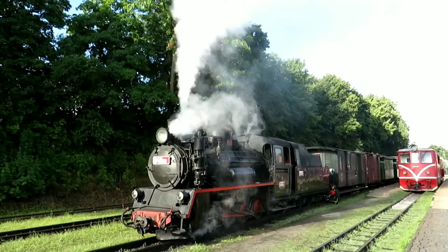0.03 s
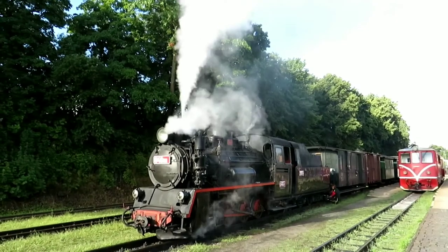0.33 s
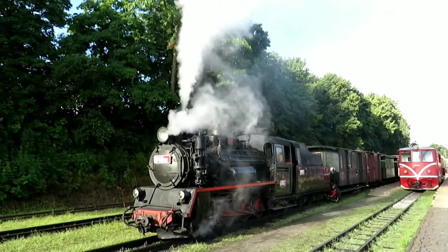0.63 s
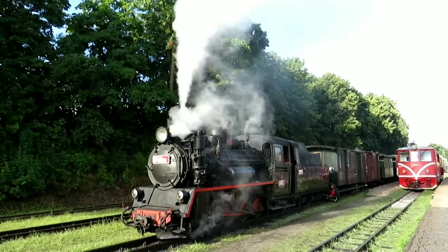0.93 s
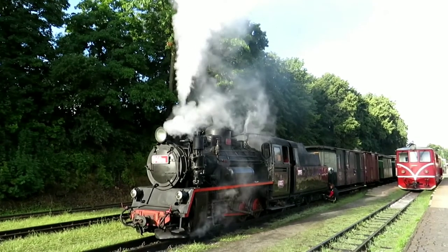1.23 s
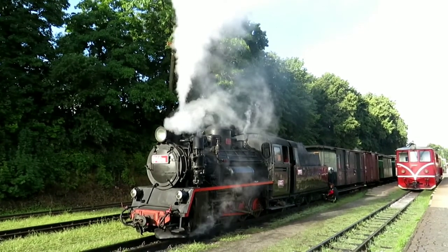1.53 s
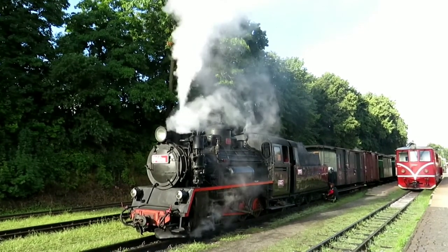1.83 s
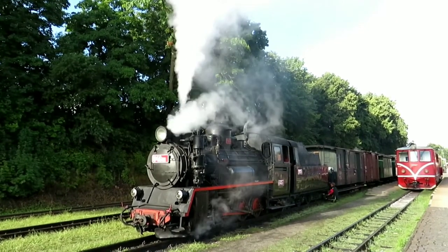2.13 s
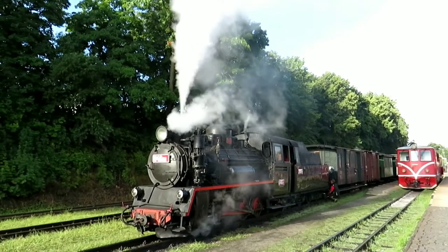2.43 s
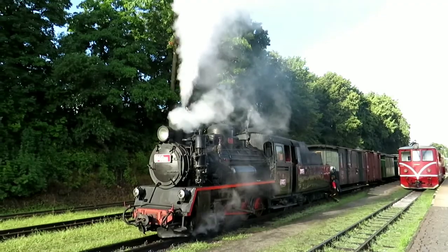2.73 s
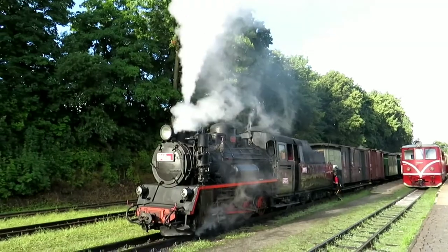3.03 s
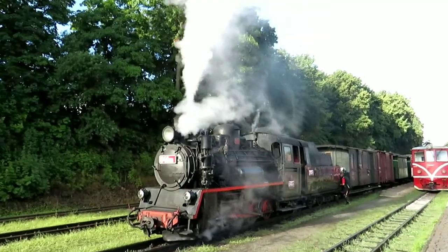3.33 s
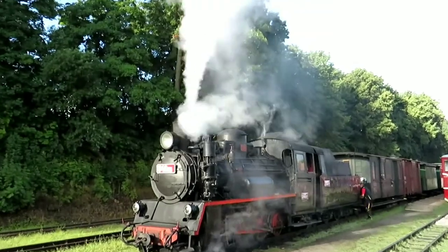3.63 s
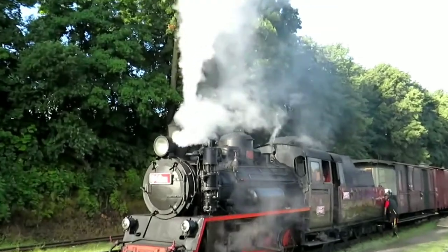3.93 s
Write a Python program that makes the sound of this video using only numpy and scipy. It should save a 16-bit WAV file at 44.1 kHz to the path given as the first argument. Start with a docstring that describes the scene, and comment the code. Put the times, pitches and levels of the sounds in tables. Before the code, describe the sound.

A standing steam locomotive's air pump puffs through the chimney about twice a second, sharp cracking strokes alternating with softer rushing ones. Each thumps and hisses away over a steady steam leak and faint boiler rumble outdoors.

```python
"""The air pump of a standing steam locomotive exhausts up the chimney, one double stroke a second.
At first a soft stroke is dying away over a steady steam leak and the rumble of the boiler.
At 0.4 s a sharp stroke opens with a crack; about half a second later a soft one opens with a rush.
Each thumps, then blows down and grows duller, and the two kinds alternate to the end.
Throughout, the chimney's resonances colour the steam, and trees and wagons add a short echo."""
import sys
import numpy as np
from scipy import signal
from scipy.fft import rfft, irfft
from scipy.io import wavfile
from scipy.ndimage import uniform_filter1d, map_coordinates

SR = 44100
rng = np.random.default_rng(int(sys.argv[2]) if len(sys.argv) > 2 else 0)


def wav_record(signal):
    """Record a signal, one row per channel, as 16-bit PCM in the file named by sys.argv[1]."""
    frames = np.transpose(np.atleast_2d(signal))
    bounded = np.clip(frames, -1, 1)
    # unit amplitude maps onto the largest positive 16-bit level
    quanta = np.round(bounded * 32767).astype(np.int16)
    wavfile.write(sys.argv[1], SR, quanta)


N = 176400

# Each row: start in seconds; relative crack, blast, thump and flow levels in dB; flow drop in dB,
# exponent of the drop, relative hiss level in dB, hiss fade in dB per second.
SHARP_STROKES = [(0.4145, -2, 0.5, 4, 1, 16, 2.23, 2.5, 59), (1.4251, -1.5, 2.5, 0, 0, 16, 2.5, 0, 54),
                 (2.4219, -2, 1.5, 0, 3, 14, 1.55, 1.5, 56.5),
                 (3.4012, -2, 2.5, 4.5, 1.5, 11, 1.94, 0.5, 70)]
# Each row: start in seconds; relative rush, thump and flow levels in dB; then as above from flow drop.
SOFT_STROKES = [(-.13, -6, -4, 1, 20.5, 4.3, -2, 17.5), (0.871, -3, 5.5, 3, 14.5, 2.8, 3.5, 35),
                (1.873, -4, 5, 3.5, 12.5, 4.2, 2, 30), (2.866, 1, 6, 0, 11, 9.2, 2.5, 39),
                (3.84, -0.5, 5.5, 2.5, 9, 3.7, 3, 41)]
# Spectra of the sources. Each row: frequency in Hz, relative spectral density in dB.
CRACK_SPECTRUM = [(40, -39), (250, -17), (1500, -10), (3000, -3), (4000, -1.5), (5000, 2.5), (5700, -6),
                  (7300, -10.5), (8300, -18), (11000, -23.5), (12500, -31), (15500, -37)]
BLAST_SPECTRUM = [(60, -30), (200, -0.5), (450, 6), (1200, 2.5), (2300, 4.5), (3500, -1.5), (6000, -21.5),
                  (10000, -39), (15500, -42)]
RUSH_SPECTRUM = [(60, -40), (200, -18.5), (450, 10.5), (900, 7), (2100, 9), (3200, 2), (5000, -10.5),
                 (9000, -23.5), (15500, -36)]
THUMP_SPECTRUM = [(25, -35), (42, -18), (62, -10), (95, -11), (135, -16.5), (185, 5), (280, -4.5),
                  (450, 1.5), (1500, -43), (15500, -80)]
FLOW_SPECTRUM = [(40, -71), (120, -38.5), (200, -8.5), (330, -7), (480, -2.5), (1100, -0.5), (2000, -1),
                 (3000, -2.5), (4300, -9.5), (6000, -23), (10000, -35.5), (15500, -57)]
HISS_SPECTRUM = [(300, -17), (2000, -20.5), (4000, 1.5), (5500, 0), (8000, -6.5), (10500, -11.5),
                 (13000, -19), (15500, -40)]
LEAK_SPECTRUM = [(40, -57), (130, -15), (195, -2.5), (330, -2), (520, 4.5), (1100, 1.5), (2400, -2),
                 (3200, -9.5), (4400, -11), (5500, -22), (9000, -29.5), (12000, -45), (15500, -49)]
RUMBLE_SPECTRUM = [(20, -11), (42, -20), (62, -1.5), (78, 1), (97, 1.5), (125, -1), (250, -13), (1000, -52)]
# Resonances and hollows of the chimney. Each row: frequency in Hz, width in Hz, gain in dB.
CHIMNEY_RESONANCES = [(202, 26, 0), (347, 59, -6), (537, 60, 4.5), (683, 46, -7), (793.5, 90, 6),
                      (1632, 110, 5.5), (1780, 54, -1.5), (1963, 120, 4), (2445, 164, 6.5), (2767, 33, 5),
                      (3184, 47, 4.5), (3270, 140, -4), (3511, 74, 8), (3620, 75, -8), (3833, 130, 5),
                      (4440, 180, 4), (4610, 80, -13), (4710, 120, 7), (5220, 55, 1), (6470, 82, 4.5)]
# Stereo spread. Each row: frequency in Hz, gain of the side signal in dB.
SIDE_SPECTRUM = [(100, -47), (1300, -96), (2400, -24.5), (4400, -11), (8000, -3.5), (15000, -6)]

SNAP_DB, CRACK_DB, BLAST_DB, RUSH_DB, THUMP_DB = 7, -12, -14.5, -17, -29.5
FLOW_DB, HISS_DB, LEAK_DB, RUMBLE_DB = -21.5, -29, -30, -54.5
SPUTTER_DB, SPUTTER_HZ, FLUTTER_DB, FLUTTER_HZ, SPIT_DB, SPIT_HZ = 0.5, 129, 0.82, 30, 0.5, 2500
RUSH_ATTACK_S, RUSH_PEAK_S, RUSH_WIDTH_S = 0.022, 0.041, 0.038
ECHO_DB, ECHO_T60_S, ECHO_DELAY_S = -10.5, 0.3, 0.015
TAPS = 8192


def undb(db):
    """Amplitude grows tenfold with every 20 dB."""
    return 10 ** (np.asarray(db) / 20)


def curve_db(points):
    """A spectrum is interpolated between its points on a log-frequency axis."""
    hz, db = np.array(points, float).T
    return np.interp(np.log(np.fft.rfftfreq(TAPS, 1 / SR) + 1), np.log(hz), db)


def minimum_phase(db):
    """Folding the cepstrum gives a causal impulse response with the given gain."""
    cepstrum = irfft(np.log(undb(db)))
    cepstrum[1:TAPS // 2] *= 2
    cepstrum[TAPS // 2 + 1:] = 0
    return irfft(np.exp(rfft(cepstrum)))


def ring(x, response):
    """Convolution applies a response; a mirrored lead-in has it sounding from the start."""
    lead_in = x[len(response) - 1:0:-1]
    return signal.fftconvolve(np.concatenate([lead_in, x]), response, mode="valid")


def colour(x, db):
    """A filter of unit energy colours a white sound and keeps its power."""
    response = minimum_phase(db)
    return ring(x, response / np.sqrt(np.sum(response ** 2)))


def wander(hz):
    """Noise averaged twice over 1 / hz seconds fluctuates smoothly; its spread is set to 1."""
    window = max(int(SR / hz), 1)
    drift = uniform_filter1d(rng.standard_normal(N), window, mode="wrap")
    drift = uniform_filter1d(drift, window, mode="wrap")
    return drift / drift.std()


def since(start):
    """Time runs in seconds from an onset and is 0 before it."""
    return np.maximum(np.arange(N) / SR - start, 0)


def puff(age, attack_s, decay_s):
    """A transient rises linearly and decays exponentially."""
    return np.minimum(age / attack_s, 1) * np.exp(-np.maximum(age - attack_s, 0) / decay_s)


def surroundings(x):
    """Scattering from trees and wagons adds a short, dull echo that decays exponentially."""
    t = np.arange(SR // 2) / SR
    tail = rng.standard_normal(len(t)) * (t > ECHO_DELAY_S) * np.exp(-np.log(1000) * t / ECHO_T60_S)
    tail /= np.sqrt(np.sum(tail ** 2))
    tail = signal.sosfilt(signal.butter(1, 5000, fs=SR, output="sos"), tail)
    return x + undb(ECHO_DB) * ring(x, tail)


def boiler_rumble():
    """The boiler radiates stationary low-frequency noise."""
    return undb(RUMBLE_DB) * colour(rng.standard_normal(N), curve_db(RUMBLE_SPECTRUM))


def steam_leak():
    """A leak is a continuous jet whose level flickers; returns (envelope, spectrum, dB)."""
    return undb(1.7 * wander(hz=27)), LEAK_SPECTRUM, LEAK_DB


def chimney(jets):
    """The spitting turbulence of each steam jet excites the resonances of the pipe."""
    hz = np.fft.rfftfreq(TAPS, 1 / SR)
    pipe_db = sum(db / (1 + (2 * (hz - centre) / width) ** 2) for centre, width, db in CHIMNEY_RESONANCES)
    spit = undb(SPIT_DB * wander(SPIT_HZ))
    spit /= np.sqrt(np.mean(spit ** 2))
    sound = np.zeros(N)
    for envelope, spectrum, db in jets:
        turbulence = envelope * spit * rng.standard_normal(N)
        sound += undb(db) * colour(turbulence, curve_db(spectrum) + pipe_db)
    return sound


def waver(x, spread_s=0.000419, hz=10.32):
    """A varying delay modulates frequency, so the resonances wander slightly in pitch."""
    return map_coordinates(x, [np.arange(N) + spread_s * SR * wander(hz)], order=5, mode="mirror")


def snaps():
    """Each sharp stroke begins with one pressure front, a filtered impulse."""
    fronts = np.zeros(N)
    for start, crack_db, *_ in SHARP_STROKES:
        fronts[int(start * SR)] = undb(SNAP_DB + crack_db)
    return colour(fronts, curve_db(CRACK_SPECTRUM))


def cracks():
    """Broadband spray follows each front and decays within milliseconds."""
    envelope = sum(undb(CRACK_DB + crack_db) * puff(since(start), attack_s=0.00041, decay_s=0.0078)
                   for start, crack_db, *_ in SHARP_STROKES)
    return colour(envelope * rng.choice([-1, 1], N), curve_db(CRACK_SPECTRUM))


def blow_down(age, flow_db, drop_db, exponent, hiss_db, fade_db_per_s, valve_s, length_s):
    """As the cylinder empties, the flow level falls ever faster while the hiss decays exponentially."""
    valve = np.minimum(age / valve_s, 1) * np.exp(-np.maximum(age - length_s, 0) / valve_s)
    flow = undb(flow_db - drop_db * (age / length_s) ** exponent)
    hiss = undb(hiss_db - fade_db_per_s * age)
    return valve * np.array([flow, hiss])


def air_pump():
    """Each stroke releases steam under pressure; returns five jets as (envelope, spectrum, dB)."""
    blast, rush, thump = np.zeros((3, N))
    steam = np.zeros((2, N))
    for start, _, blast_db, thump_db, *exhaust in SHARP_STROKES:
        age = since(start)
        blast += undb(blast_db) * puff(age, attack_s=0.0076, decay_s=0.016)
        thump += undb(thump_db) * puff(age, attack_s=0.0022, decay_s=0.03)
        steam += blow_down(age, *exhaust, valve_s=0.034, length_s=0.42)
    for start, rush_db, thump_db, *exhaust in SOFT_STROKES:
        age = since(start)
        swell = np.exp(-0.5 * ((age - RUSH_PEAK_S) / RUSH_WIDTH_S) ** 2)
        rush += undb(rush_db) * np.minimum(age / RUSH_ATTACK_S, 1) * swell
        thump += undb(thump_db) * puff(age, attack_s=0.0022, decay_s=0.03)
        steam += blow_down(age, *exhaust, valve_s=0.026, length_s=0.53)
    flow, hiss = steam * undb(SPUTTER_DB * wander(SPUTTER_HZ) + FLUTTER_DB * wander(FLUTTER_HZ))
    return [(blast, BLAST_SPECTRUM, BLAST_DB), (rush, RUSH_SPECTRUM, RUSH_DB),
            (thump, THUMP_SPECTRUM, THUMP_DB), (flow, FLOW_SPECTRUM, FLOW_DB),
            (hiss, HISS_SPECTRUM, HISS_DB)]


def scene():
    """The sources superpose straight ahead; an uncorrelated side signal spreads only the treble."""
    jets = air_pump() + [steam_leak()]
    mid = boiler_rumble()
    mid += waver(surroundings(chimney(jets)))
    mid += surroundings(snaps() + cracks())
    uncorrelated = surroundings(chimney(jets) + cracks())
    side = ring(uncorrelated, minimum_phase(curve_db(SIDE_SPECTRUM)))
    return np.array([mid + side, mid - side])


def record(dry):
    """A steep low-pass filter removes the treble above 15.5 kHz."""
    return signal.sosfilt(signal.ellip(8, 0.2, 70, 15500, fs=SR, output="sos"), dry)


dry = scene()
out = record(dry)
wav_record(out)
```